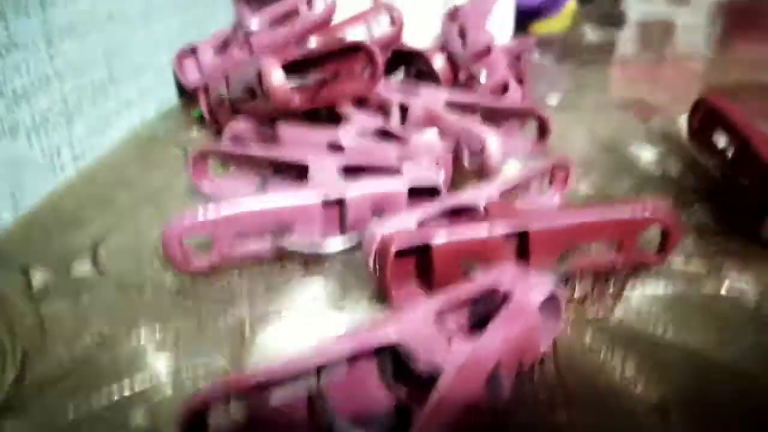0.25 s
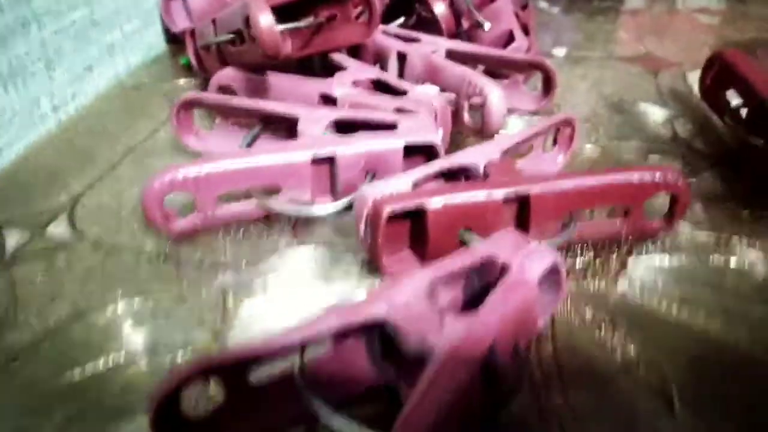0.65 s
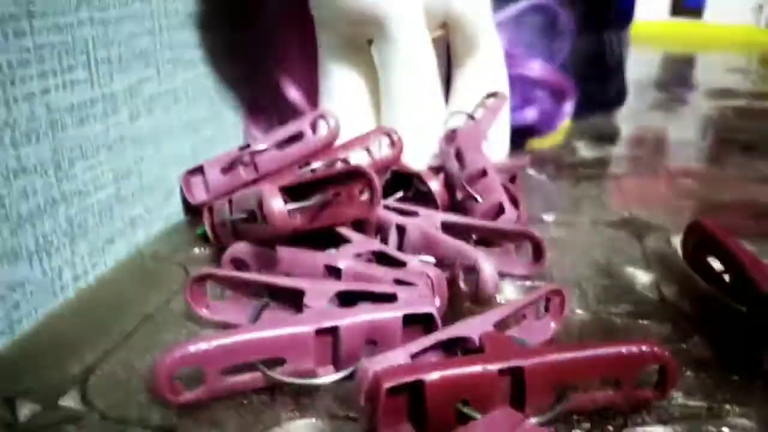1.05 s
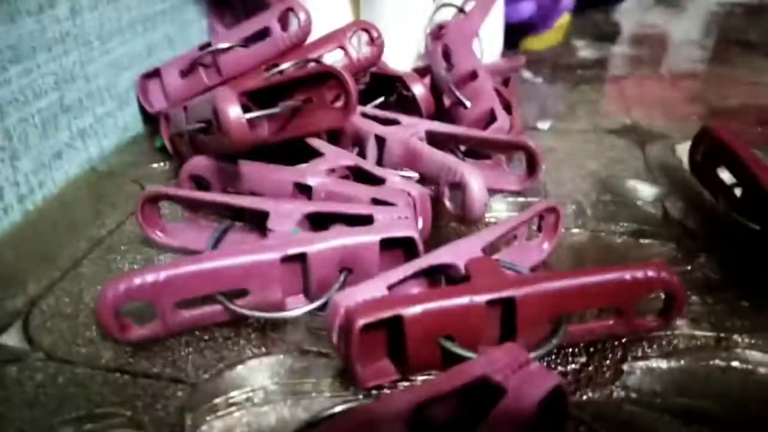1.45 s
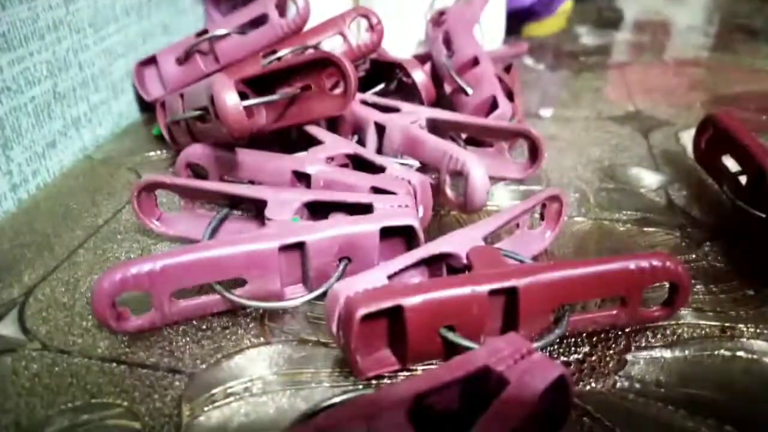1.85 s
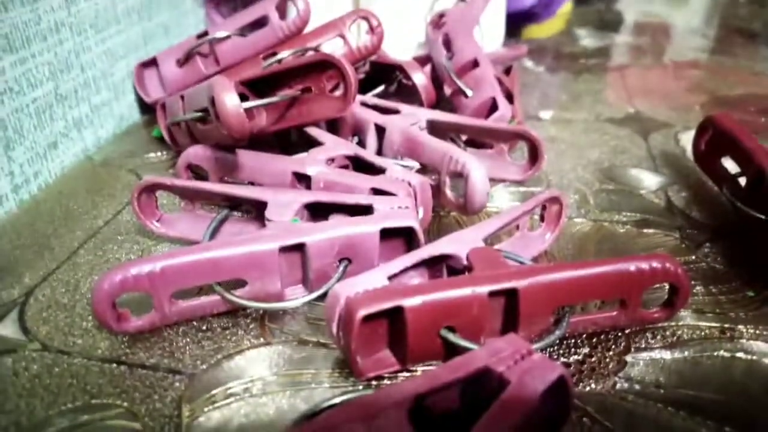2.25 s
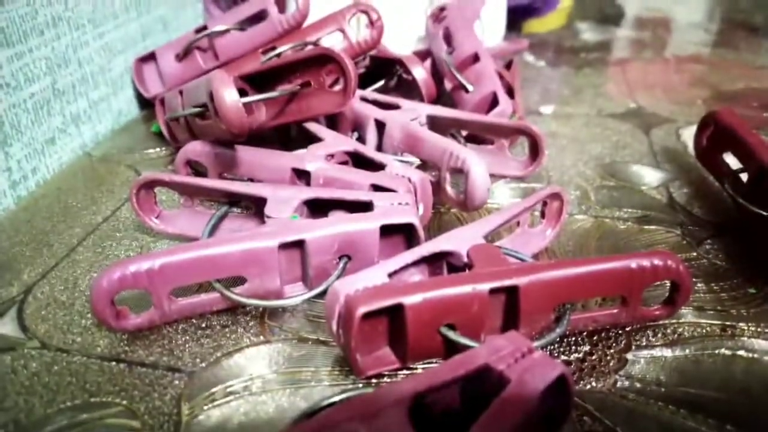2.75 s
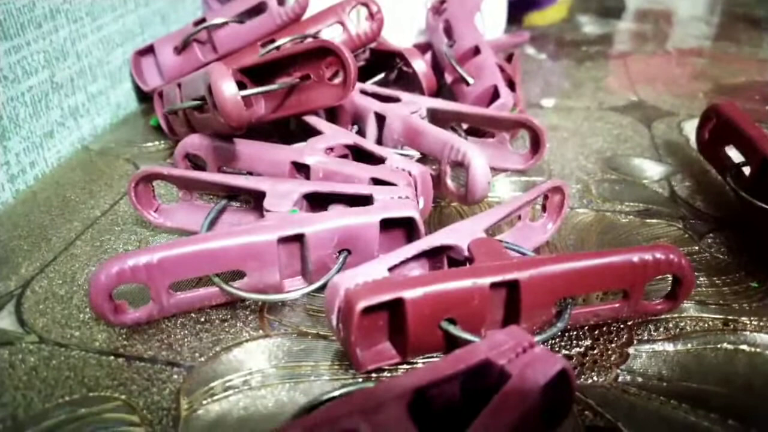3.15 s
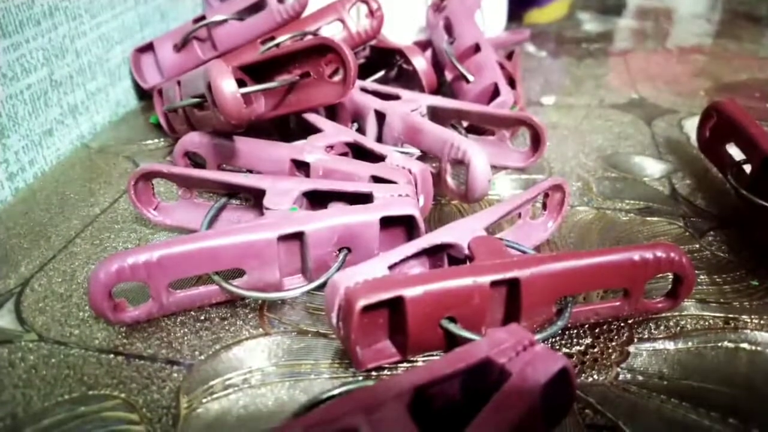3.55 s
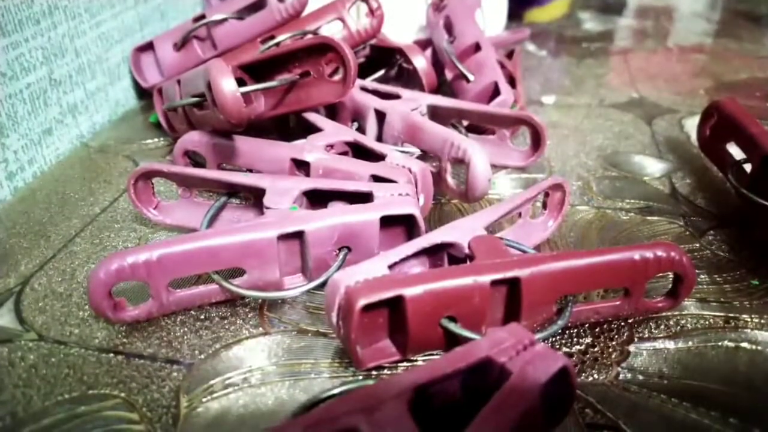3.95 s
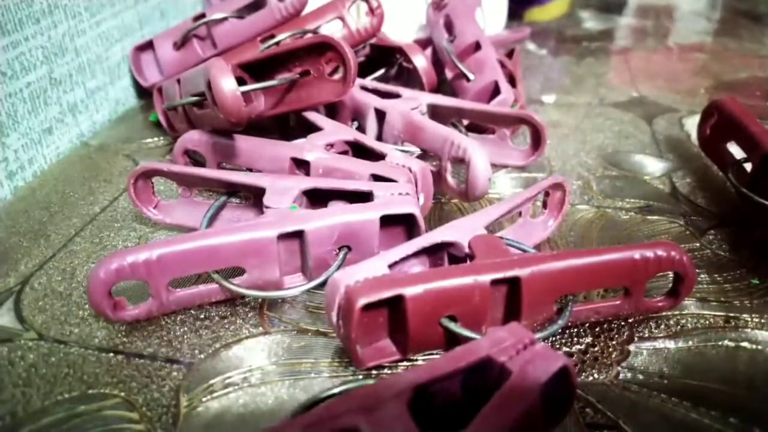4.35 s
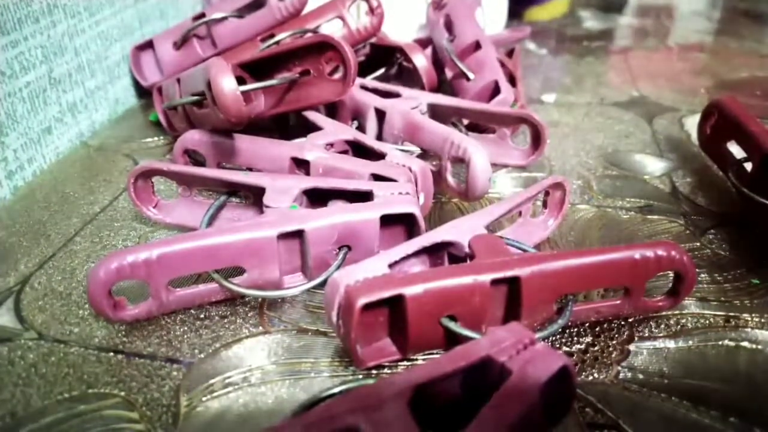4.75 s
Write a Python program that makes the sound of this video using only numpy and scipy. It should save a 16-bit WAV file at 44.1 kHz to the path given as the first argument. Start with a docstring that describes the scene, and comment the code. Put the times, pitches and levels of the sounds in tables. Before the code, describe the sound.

A hand-held microphone sits close to plastic clothespins in a small room, with a faint steady low hum, thin hiss and a slight hollow flutter throughout. Fingers rub the microphone on the left at first, with a small tap at about 0.4 seconds. From 1.3 seconds the clothespins tick lightly together, and at 1.7 comes a brighter cluster of clicks with a tiny steel spring ring and a slight room echo. A dull bump follows near 1.9. At 2.2 seconds one hard, sharp knock hits the microphone on the left, by far the loudest sound, with a brief rattle. Another crisp plastic click comes at 2.8. Soft, low hand thumps land on the left around 3.6 to 3.7 and again at 4.1, among very faint ticks and scuffs. At about 4.9 seconds the clothespins clatter briefly one last time.

```python
"""A hand-held camera sits close to a heap of plastic clothespins in a small, humming room.
First, fingers rub and tap the camera beside its left microphone, over a faint flutter and hiss.
From 1.3 s the pins are nudged and click together; at 1.7 s a steel spring rings, and the room echoes.
At 2.2 s the camera takes one hard knock, and more clicks follow. From 3.6 s the hand thumps it softly,
and just before 5 s the pins clatter one last time."""
import sys
import numpy as np
from scipy import signal
from scipy.fft import rfft, irfft
from scipy.io import wavfile

SR = 44100
rng = np.random.default_rng(int(sys.argv[2]) if len(sys.argv) > 2 else 0)


def wrap_up_sound(samples):
    """Save the sound to the file named by the first command line argument, as 16-bit audio."""
    columns = np.atleast_2d(samples).T
    # keep every value between -1 and 1, then stretch to whole-number steps
    tamed = np.clip(columns, -1, 1)
    steps = np.round(tamed * 32767).astype(np.int16)
    wavfile.write(sys.argv[1], SR, steps)


N = 220676
TIME = np.arange(N) / SR
TREBLE_LIMIT_HZ = 14350

# Pins touching, plus (at 1.287 s) one small tick on the case by the left microphone: start_s, level_db,
# left_over_right_db, low_hz, high_hz, accent_hz, accent_db, ring_time_factor, settle_s
PIN_CLICKS = [(1.2565, -32.5, 12.5, 3730, 11000, 4500, 3, 0.27, 0),
              (1.2871, -35, 14, 2200, 3900, 3020, 0, 0.13, 0),
              (1.4283, -34.5, -11, 7500, 14000, 11000, 5, 0.089, 0.00015),
              (1.437, -41, -8, 6600, 14000, 11100, 9, 6.5, 0),
              (1.7412, -23, 5, 4800, 14100, 5740, 17, 1.1, 0.0076),
              (1.752, -29, 3, 2700, 13500, 6200, 3, 2.5, 0.011),
              (1.805, -34, 0, 2780, 13000, 5500, -1, 4.1, 0),
              (1.827, -38.5, 4, 2827, 10740, 3220, 8, 2.5, 0.022),
              (2.628, -44, 14, 2150, 6000, 3474, 8, 3.05, 0.00094),
              (2.7974, -22, -2, 7600, 11570, 10200, 4, 0.94, 0),
              (2.7977, -32, -4, 1210, 8000, 3030, 7, 0.81, 0.0011),
              (2.8002, -28, 12.5, 1160, 6200, 3230, 6, 0.86, 0.0022),
              (2.8151, -38.5, 17, 1279, 6000, 2074, 3, 0.55, 0.0024),
              (3.54, -53.5, 34.5, 2970, 12870, 10540, 9, 1.6, 0),
              (3.807, -55, -2, 1425, 8000, 2100, 6.5, 3.9, 0.0041),
              (4.21, -58.5, -12, 1384, 6020, 2270, 1, 5, 0),
              (4.8936, -30.5, -6, 1986, 11000, 4790, 9.5, 1.1, 0.015),
              (4.895, -29.5, -3, 1940, 12050, 2190, 13.5, 1.25, 0.00035),
              (4.903, -40, 0, 550, 9000, 2204, 5, 1.72, 0),
              (4.9104, -40, -5, 900, 7020, 3197, 14, 1.4, 0.0029),
              (4.9161, -22, -11, 2503, 12800, 10000, 13.5, 0.22, 0.0049)]
# The tones a plastic pin rings with: pitch_hz, level_db
PIN_TONES = [(1450, 9), (1780, 8), (2120, 12), (2520, 2), (3020, 12), (3330, 0.5), (3720, 10.5),
             (4400, -29), (4950, 3), (5500, 14.5), (5980, 3), (7200, 12), (8100, 13.5), (8600, 17),
             (9400, 12.5), (10300, 15)]
# A pin catching a spring: start_s, level_db, left_over_right_db
SPRING_TWANGS = [(1.7395, -42, 3), (1.75, -53, 4)]
# The closely spaced tones of a steel spring: pitch_hz, level_db
SPRING_TONES = [(5397, -1.5), (5511, -1), (5632, -5), (5688, -4), (5857, -10), (6052, -2.5), (6185, -4),
                (6337, -9)]
# Sharp knocks on the camera: start_s, level_db, low_cut_hz, chatter_db
CAMERA_KNOCKS = [(0.3565, -32.5, 298, -67), (2.158, -41.5, 300.4, -42.5), (2.173, -29.5, 400, -44),
                 (2.1866, -23.5, 490.6, -29.5), (2.1957, 5.5, 66, -43.5)]
# The colour of a knock (how strong it is from low to high): pitch_hz, level_db
KNOCK_COLOUR = [(30, 16), (70, 14), (140, 8), (250, 11), (650, 5), (1500, 7.5), (3000, 7.5), (3550, -3.5),
                (4800, -1.5), (6300, -21.5), (8000, -15), (9000, 0), (10300, -11), (14000, -7.5)]
# The colour of the case chattering after a knock: pitch_hz, level_db
CASE_CHATTER_COLOUR = [(130, 4), (220, 9.5), (450, -7), (750, -10.5), (1100, -14), (2200, -16),
                       (3200, -21.5)]
# The hand landing softly on the camera: start_s, level_db, pitch_hz
HAND_THUMPS = [(3.629, -23.5, 176), (3.639, -22, 103.5), (3.656, -31.5, 232), (3.679, -35, 107),
               (3.683, -27, 222), (3.702, -23, 88.8), (4.096, -20.5, 87), (4.107, -25, 135.6),
               (4.536, -48.5, 112.5), (4.766, -40, 70), (4.965, -34.5, 89)]
# The case ringing after a thump: pitch_hz, level_db, ring_s (time to fade by 60 dB)
CASE_TONES = [(123.84, -11, 0.43), (241, -20, 0.371)]
# Other dull bumps: start_s, level_db, pitch_hz, ring_s, left_over_right_db
DULL_BUMPS = [(0.3546, -24, 430, 0.011, 28), (1.949, -17, 328, 0.018, -6.5)]
# Fingers stroking the case: start_s, length_s, rise_s, slide_db, drag_db
FINGER_STROKES = [(0, 0.27, 0.0047, -74, -58), (.265, 0.087, 0.0073, -46.5, -57),
                  (.325, 0.062, 0.037, -41.5, -48.5), (.42, 0.055, 0.027, -65, -72),
                  (.62, 0.17, 0.02, -81, -63.5), (.94, 0.015, .014, -45, -54),
                  (1.28, 0.082, 0.0064, -53, -56), (1.72, 0.25, 0.01, -52, -57.5),
                  (2.07, 0.029, 0.016, -65, -46), (2.2, 0.13, 0.024, -51.5, -52.5),
                  (2.62, 0.04, .014, -69, -53.5), (3.6, 0.078, 0.048, -44.5, -80.5)]
# The resting hand slowly creeping: start_s, length_s, slide_db, drag_db
RESTING_GRIP = (0.33, 4.5, -75, -77)
# The bright colour of sliding skin: pitch_hz, level_db
SKIN_SLIDE_COLOUR = [(1800, -17), (3200, -17.5), (5000, -9.5), (7000, -1.5), (8500, -1.5), (9900, 6),
                     (11000, -1.5), (14000, -4.5)]
# The duller colour of a firm grip dragging: pitch_hz, level_db
SKIN_DRAG_COLOUR = [(900, -1), (1600, -14), (2350, -4), (2750, -3.5), (3300, 2), (3650, -0.5), (3950, 3),
                    (4450, -19), (6000, -11)]
# Things dragged briefly: start_s, length_s, level_db, pitch_hz, left_over_right_db
SHORT_SCUFFS = [(0.344, 0.05, -54.5, 520, 18), (1.317, 0.078, -54, 240, 8), (1.497, 0.047, -59.5, 527, -12),
                (1.637, 0.11, -58.5, 471, -5.5), (1.955, 0.062, -53.5, 333.4, -0.5),
                (2.152, 0.02, -49, 600, 17.5), (2.695, 0.12, -63.5, 3070, 9), (3.149, 0.13, -55, 434, -13),
                (3.61, .13, -68.5, 2270, 15), (4.533, 0.056, -53, 241, 5.5), (4.883, .05, -59.5, 700, 0)]
# The echo of the room: pitch_hz, ring_s
ROOM_RING_TIMES = [(200, 0.81), (1000, 0.35), (3000, 0.42), (7000, 0.4), (14000, 0.27)]
# How a hollow flutter moves: time_s, level_db, pitch_hz
FLUTTER_PATH = [(0.0, -69, 790), (0.55, -64, 844), (1.0, -55, 842.5), (1.13, -94, 763), (1.25, -54.5, 783),
                (1.45, -66, 700), (1.65, -62.5, 860), (2.16, -60, 840.4), (2.63, -70, 863),
                (2.98, -64, 801), (3.72, -83, 767), (5.0, -77, 691)]
# Faint, random blips: pitch_hz, level_db, blips_per_s
BLIP_BANDS = [(746.6, -55.5, 7.1), (1214, -62.5, 6.5), (1980, -65, 4.6)]
# Airy hiss while the hand is close: start_s, length_s, level_db
AIRY_HISS_SPAN = (0.73, 2.15, -57)
# The colour of the airy hiss: pitch_hz, level_db
AIRY_HISS_COLOUR = [(9000, -33.5), (11800, -15), (12700, 5), (14300, -0.5)]
# Mains hum: pitch_hz, level_db
HUM_TONES = [(120, -50), (240, -70), (360, -77.5)]
# The colour of the room's own low rush: pitch_hz, level_db
ROOM_AIR_COLOUR = [(20, -10.5), (45, -3.5), (75, 6.5), (110, 9.5), (170, -4), (250, -7), (340, -13.5),
                   (450, -10), (600, -21), (1100, -20.5), (1600, -26), (2500, -46), (5000, -34.5)]
# The colour of microphone hiss: pitch_hz, level_db
MIC_HISS_COLOUR = [(2000, -45.5), (4000, -61), (6000, -50), (6800, -33), (8000, -31.5), (9700, -23),
                   (11500, -31.5), (12600, -45.5), (14500, -84.5)]
# Swells of smooth hiss on the left: start_s, length_s, start_db, sag_db_per_s
HISS_SWELLS = [(0, 1.2, -53, 41), (1.013, 0.44, -63, -22), (1.613, 1.8, -52, 0.5)]
# The colour of those swells: pitch_hz, level_db
HISS_SWELL_COLOUR = [(4500, 0), (5500, 5), (6200, 14.5), (7800, 17), (8600, 14), (9500, -7.5),
                     (11500, -11.5)]


def pins(tones_db=-2, snap_s=0.0003, scuff_db=-7, scuff_s=0.0056, accent_width=0.11, detune=0.02):
    """Each touch makes a snap and a short scuff, and sets a slightly different pin ringing."""
    out, t = np.zeros((2, N)), np.arange(4096) / SR
    hz, db = np.transpose(PIN_TONES)[:, :, None]
    ring_s = .018 * (2000 / hz) ** .35  # neighbours in the heap damp a pin, its high tones most
    for start, level_db, pan_db, low_hz, high_hz, accent_hz, accent_db, stretch in pin_touches():
        own_hz = hz * (1 + detune * rng.standard_normal(hz.shape))
        tones = ringing_tones(own_hz, db, ring_s * stretch, t)
        fade = np.exp(-t / (snap_s * stretch)) + amp(scuff_db) * np.exp(-t / (scuff_s * stretch))
        crack = rng.standard_normal((2, len(t))) * fade
        onset = 1 - np.exp(-t / (0.00015 * stretch))
        click = (amp(tones_db) * unit(tones) + unit(crack)) * onset
        accent = signal.lfilter(*signal.iirpeak(accent_hz, 1 / accent_width, SR), click)
        cut_lows = signal.butter(6, low_hz, "high", fs=SR, output="sos")
        cut_highs = signal.butter(4, min(high_hz, TREBLE_LIMIT_HZ), fs=SR, output="sos")
        click = signal.sosfilt(np.vstack([cut_lows, cut_highs]), click + amp(accent_db) * accent)
        strength = 2 * np.sqrt(np.mean(click[:, :SR // 500] ** 2, axis=1, keepdims=True))  # first 2 ms
        add(out, start, amp(level_db) * sides(pan_db) * click / strength)
    return out


def pin_touches(bounces=3, first_bounce_db=-2, next_bounce_db=-4.5):
    """Lists every touch, plus ever weaker bounces for pins that take a while to settle."""
    rows, chances = [], rng.random((len(PIN_CLICKS), bounces))
    for (start, level_db, *voice, settle_s), chance in zip(PIN_CLICKS, chances):
        rows.append((start, level_db, *voice))
        if settle_s > .005:
            for k in range(bounces):
                delay = settle_s * (k + .5 + chance[k] / 2) / bounces
                rows.append((start + delay, level_db + first_bounce_db + k * next_bounce_db, *voice))
    return rows


def springs(ring_s=0.07, rise_s=.0006):
    """A steel spring's tones lie so close together that they shimmer as they fade."""
    out, t = np.zeros((2, N)), np.arange(SR // 4) / SR
    hz, db = np.transpose(SPRING_TONES)[:, :, None]
    for start, level_db, pan_db in SPRING_TWANGS:
        ring = ringing_tones(hz, db, ring_s, t) * (1 - np.exp(-t / rise_s))
        add(out, start, amp(level_db) * sides(pan_db) * ring)
    return out


def knocks(right_db=-42, buzz_db=-34, buzz_s=0.02):
    """A fingertip snaps on the case: the left microphone is jolted and loose parts buzz and chatter."""
    hz = abs(np.fft.fftfreq(4096, 1 / SR)) + 1
    t = np.arange(len(hz) // 2) / SR
    shake_power = sum((amp(db) * envelope(start, 0, rise_s=0.0019, fall_db_per_s=117.5)) ** 2
                      for start, _, _, db in CAMERA_KNOCKS)
    out = np.sqrt(shake_power) * friction(CASE_CHATTER_COLOUR, slips_per_s=770, slip_share=0.37)
    for start, level_db, low_hz, _ in CAMERA_KNOCKS:
        gain = amp(look_up(KNOCK_COLOUR, hz)) / (1 + (low_hz / hz) ** 7)
        gain = gain / (1 + (hz / TREBLE_LIMIT_HZ) ** 20) + 1e-5
        # Turn that colour into one pulse that starts suddenly (minimum phase).
        spectrum = np.exp(np.conj(signal.hilbert(np.log(gain))))
        jolt = np.fft.ifft(spectrum).real[:len(t)]
        buzz = amp(buzz_db) * rng.standard_normal(len(t)) * np.exp(-t / buzz_s)
        add(out, start, amp(level_db) * (buzz - jolt / abs(jolt).max()))
    return out * mostly_left(right_db)


def thumps(press_s=0.0074, right_db=-28):
    """The hand gives way softly as it lands on the camera, and the case rings on."""
    out, age = np.zeros((2, N)), np.minimum(TIME / press_s, 20)
    press = (age * np.exp(1 - age)) ** 2
    for start, db, hz in HAND_THUMPS:
        thud = amp(db) * press * np.sin(2 * np.pi * hz * TIME)
        ring = sum(soft_blow(db + tone_db, tone_hz, ring_s, rise_s=0.009)
                   for tone_hz, tone_db, ring_s in CASE_TONES)
        add(out, start, (thud + ring) * mostly_left(right_db))
    return out


def bumps():
    """Something is bumped and gives a dull note that dies at once."""
    out = np.zeros((2, N))
    for start, db, hz, ring_s, pan_db in DULL_BUMPS:
        add(out, start, sides(pan_db) * soft_blow(db, hz, ring_s, rise_s=0.0057))
    return out


def fingers(boost_db=1, right_db=-24):
    """Skin rubs the case by the left microphone: a dry rustle whose colour shifts with the grip."""
    slide = friction(SKIN_SLIDE_COLOUR, slips_per_s=4000, slip_share=.45)
    slide = patchy(slide, depth_db=2, width_hz=400, span_s=.03)
    drag = friction(SKIN_DRAG_COLOUR, slips_per_s=900, slip_share=.4)
    drag = patchy(drag, depth_db=4.5, width_hz=200, span_s=.04)
    resting = (*RESTING_GRIP[:2], 0.014, *RESTING_GRIP[2:])  # one long stroke with a 14 ms rise
    rub = np.zeros(N)
    for start, length, rise_s, slide_db, drag_db in [*FINGER_STROKES, resting]:
        rustle = amp(slide_db) * slide + amp(drag_db) * drag
        rub += envelope(start, length, rise_s, fall_db_per_s=147) * rustle
    return rub * amp(boost_db + wander(rate_hz=51)) * mostly_left(right_db)


def scuffs(width_share=0.2):
    """A dragged thing slips unevenly, making a rough note that swells and fades."""
    out = np.zeros((2, N))
    for start, length, db, hz, pan_db in SHORT_SCUFFS:
        arch = np.sin(np.pi * np.clip((TIME - start) / length, 0, 1))
        out += amp(db) * sides(pan_db) * arch * noise_band(hz * TIME, width_share * hz)
    return out


def room(sound, early_db=-9, early_s=0.019, tail_db=-4):
    """Quick echoes from table and wall, then a smooth tail whose treble dies sooner than its bass."""
    t = np.arange(SR // 2 + SR // 4) / SR
    shape = (2, len(t))
    early = rng.standard_normal(shape) * (rng.random(shape) < 1500 / SR)  # 1500 echoes a second
    early *= np.exp(-t / early_s) * (t > .002)
    hz, age, spectrum = signal.stft(rng.standard_normal(shape), SR, nperseg=256)
    fade = amp(-60 * age / look_up(ROOM_RING_TIMES, hz)[:, None])
    tail = signal.istft(spectrum * fade, SR, nperseg=256)[1][:, :len(t)]
    tail *= 1 - np.exp(-t / 0.005)
    echo = (amp(early_db) * unit(early) + amp(tail_db) * unit(tail)) / np.sqrt(len(t))
    return signal.fftconvolve(sound, echo, axes=1)[:, :N]


def flutter(boost_db=6.0, right_db=-14):
    """A hollow noise drifts in pitch while parts of it come and go."""
    level_db, pitch_hz = curve(FLUTTER_PATH)
    cycles = np.cumsum(pitch_hz) / SR
    bands = [noise_band(cycles, width_hz=115) for _ in range(2)]
    bands = np.array([patchy(band, depth_db=5, width_hz=100, span_s=.045) for band in bands])
    return bands * amp(level_db + boost_db) * mostly_left(right_db)


def blips(length_s=0.077, pitch_spread=.085, uneven_db=2, right_db=-6):
    """Short, fuzzy notes, each at its own pitch, unrelated on the two sides."""
    out, bell = np.zeros((2, N)), np.hanning(round(length_s * SR))
    t = np.arange(len(bell)) / SR
    for side in out:
        for hz, db, per_s in BLIP_BANDS:
            for k, (late, detune, size) in enumerate(rng.standard_normal((60, 3))):
                start = abs(k + late / 2) / per_s
                tone = np.sin(2 * np.pi * hz * (1 + pitch_spread * detune) * t)
                add(side, start, amp(db + uneven_db * size) * bell * tone)
    fuzz = .85 + .6 * wander(rate_hz=70)
    return out * fuzz * mostly_left(right_db)


def airy_hiss():
    """A thin, very high hiss on the left only."""
    start, length, db = AIRY_HISS_SPAN
    hiss = tint(rng.standard_normal(N), AIRY_HISS_COLOUR)
    level = amp(db) * envelope(start, length, rise_s=0.19, fall_db_per_s=147)
    return level * hiss * np.array([[1], [0]])


def hum(right_fade_db_per_s=1.5, drone_hz=71.3, drone_db=-60.5, drone_s=0.76):
    """An appliance's mains hum wavers, and fades on the right; a lower drone stops early."""
    mains = sum(amp(db) * np.sin(2 * np.pi * (hz * TIME + rng.random())) for hz, db in HUM_TONES)
    left_db = .7 * wander(rate_hz=5.7)
    right_db = 2 * wander(rate_hz=4.3) - right_fade_db_per_s * TIME
    drone = amp(drone_db) * np.sin(2 * np.pi * drone_hz * TIME)
    drone *= envelope(0, drone_s, rise_s=.01, fall_db_per_s=295)
    return np.sqrt(2) * (mains * amp([left_db, right_db]) + drone)


def room_air(level_db=-59.5, pan_db=2):
    """The room's low rush reaches both microphones and flickers differently in each."""
    rush = tint(rng.standard_normal(N), ROOM_AIR_COLOUR)
    air = np.array([patchy(rush, depth_db=6.5, width_hz=110, span_s=.05) for _ in range(2)])
    return air * amp(level_db) * sides(pan_db)


def microphone_hiss(left_db=-69, right_db=-51, swell_floor_db=-71):
    """Two unlike microphones hiss steadily; on the left, more hiss swells and sags."""
    left, right, swell = rng.standard_normal((3, N))
    swell_level = amp(swell_floor_db)
    for start, length, db, sag_db_per_s in HISS_SWELLS:
        shape = envelope(start, length, rise_s=0.026, fall_db_per_s=122.5)
        swell_level = swell_level + shape * amp(db - sag_db_per_s * (TIME - start))
    left = amp(left_db) * tint(left, MIC_HISS_COLOUR) + swell_level * tint(swell, HISS_SWELL_COLOUR)
    return np.array([left, amp(right_db) * tint(right, MIC_HISS_COLOUR)])


def ringing_tones(hz, db, ring_s, t):
    """Fading tones added up, each starting at a random point of its wave on each side."""
    phase = rng.random((2, len(hz), 1))
    return (amp(db - 60 * t / ring_s) * np.sin(2 * np.pi * (hz * t + phase))).sum(1)


def soft_blow(db, hz, ring_s, rise_s):
    """One tone that starts gently and dies away."""
    level = amp(db - 60 * np.minimum(TIME / ring_s, 4)) * (1 - np.exp(-TIME / rise_s))
    return level * np.sin(2 * np.pi * hz * (TIME + 1 / SR))


def friction(colour, slips_per_s, slip_share):
    """Rubbing: tiny slips over a smooth rush."""
    slips = rng.standard_normal(N) * (rng.random(N) < slips_per_s / SR)
    rush = rng.standard_normal(N)
    return tint(np.sqrt(slip_share) * unit(slips) + np.sqrt(1 - slip_share) * rush, colour)


def patchy(noise, depth_db, width_hz, span_s):
    """Makes narrow pitch ranges of a noise come and go on their own."""
    spectrum = signal.stft(noise, SR, nperseg=1024)[2]
    patches = rng.standard_normal(spectrum.shape)
    for axis, size in enumerate((width_hz * 1024 / SR, span_s * SR / 512)):  # blur in pitch, then time
        bell = np.exp(-2 * (np.arange(-40, 41) / size) ** 2)
        patches = signal.fftconvolve(patches, np.expand_dims(bell, 1 - axis), "same")
    hz = np.linspace(0, SR / 2, len(spectrum))[:, None]
    depth = depth_db * np.minimum(hz / 700, 1)  # the bass flickers less
    spectrum *= amp(depth * np.minimum(unit(patches), 2))
    return unit(signal.istft(spectrum, SR, nperseg=1024)[1][:N])


def noise_band(cycles, width_hz):
    """A tone blurred into noise; cycles counts its waves so far."""
    blur = wander(width_hz) + 1j * wander(width_hz)
    return (blur * np.exp(2j * np.pi * cycles)).real


def wander(rate_hz):
    """Smooth random motion with a typical size of 1."""
    hz = np.fft.rfftfreq(N, 1 / SR)
    return unit(irfft(rfft(rng.standard_normal(N)) * np.exp(-(hz / rate_hz) ** 2), N))


def tint(noise, colour):
    """Gives a noise a colour, fading out pitches beyond the table's ends."""
    hz = np.fft.rfftfreq(N, 1 / SR) + 1
    ends = 1 / (1 + (colour[0][0] / 2 / hz) ** 2) / (1 + (hz / 2 / colour[-1][0]) ** 4)
    return unit(irfft(rfft(noise) * amp(look_up(colour, hz)) * ends, N))


def envelope(start, length, rise_s, fall_db_per_s):
    """A level that rises, holds until its length is over, then dies away."""
    age = TIME - start
    return np.clip(age / rise_s, 0, 1) * amp(-fall_db_per_s * np.maximum(age - length, 0))


def look_up(table, hz):
    """A table's value at any pitch, blending between its rows."""
    pitches, values = np.transpose(table)
    return np.interp(np.log(hz + 1), np.log(pitches), values)


def curve(rows):
    """A timed table's columns at every sample."""
    times, *columns = np.transpose(rows)
    return [np.interp(TIME, times, column) for column in columns]


def amp(db):
    """Turns decibels into a multiplier."""
    return 10 ** (np.asarray(db) / 20)


def unit(sound):
    """Scales a sound to an average power of 1."""
    return sound / np.sqrt(np.mean(sound ** 2) + 1e-20)


def sides(pan_db):
    """Left and right gains, the left louder by pan_db."""
    return amp([[pan_db / 2], [-pan_db / 2]])


def mostly_left(right_db):
    """Gains that turn down only the right side."""
    return amp([[0], [right_db]])


def add(mix, start_s, sound):
    """Mixes a sound in at its start time."""
    part = mix[..., round(start_s * SR):][..., :sound.shape[-1]]
    part += sound[..., :part.shape[-1]]


def scene(thud_room_db=-12, click_room_db=-4):
    """Clicks and thuds echo in the room; all else reaches the microphones with no echo."""
    clicks = pins() + springs()
    thuds = thumps() + bumps() + scuffs()
    centred_clicks = (clicks + clicks[::-1]) / np.sqrt(2)
    handling = knocks() + fingers() + airy_hiss()
    echo = room(amp(click_room_db) * centred_clicks + amp(thud_room_db) * thuds)
    background = flutter() + blips() + hum() + room_air() + microphone_hiss()
    return clicks + thuds + echo + handling + background


def record(dry, bass_cut_hz=42, overload_level=.92):
    """The microphones lose the deepest bass, the hardest knock overloads, and the top treble is cut."""
    thinned = signal.sosfilt(signal.butter(2, bass_cut_hz, "high", fs=SR, output="sos"), dry)
    limited = np.clip(thinned, -overload_level, overload_level)
    treble_cut = signal.firwin(255, TREBLE_LIMIT_HZ, window=("kaiser", 8), fs=SR)
    return signal.oaconvolve(limited, treble_cut[None], "same")


dry = scene()
out = record(dry)
wrap_up_sound(out)
```